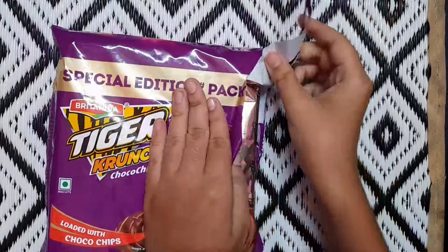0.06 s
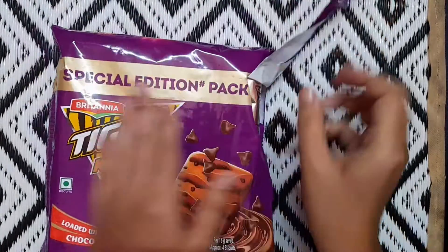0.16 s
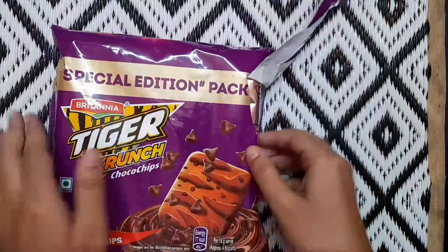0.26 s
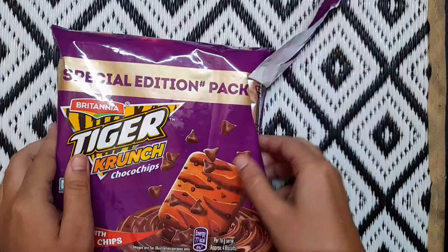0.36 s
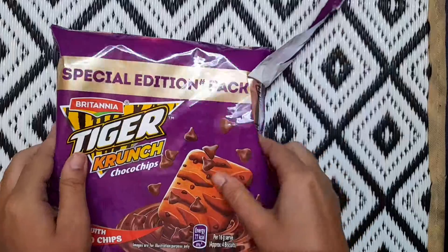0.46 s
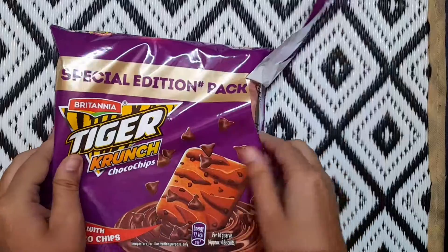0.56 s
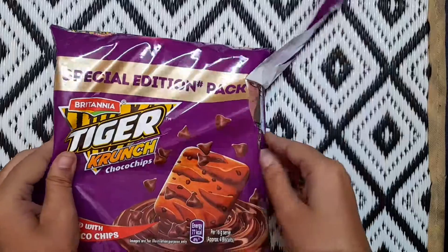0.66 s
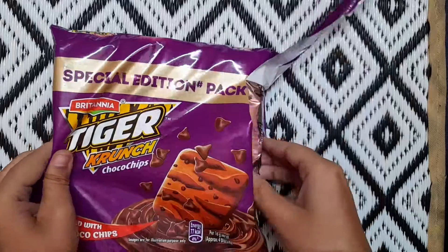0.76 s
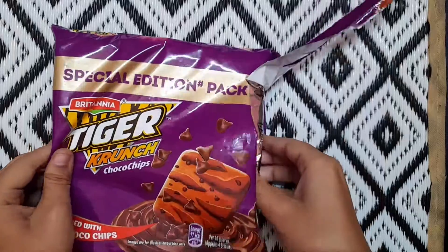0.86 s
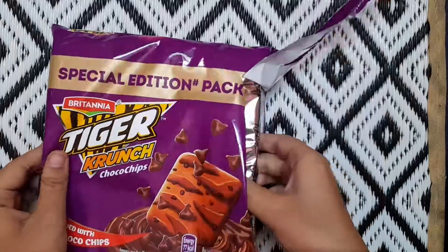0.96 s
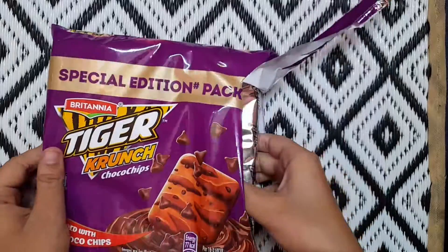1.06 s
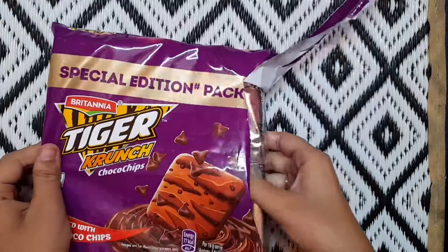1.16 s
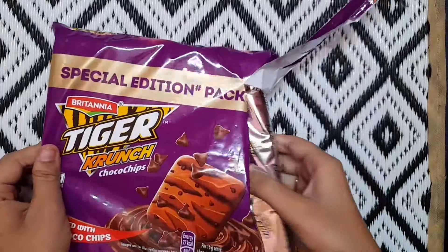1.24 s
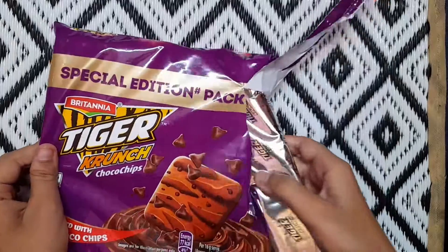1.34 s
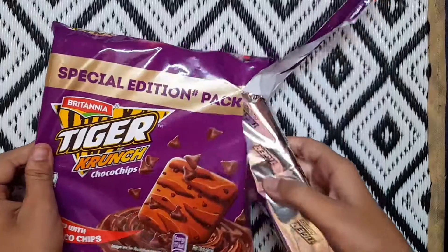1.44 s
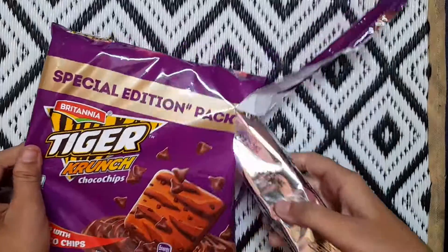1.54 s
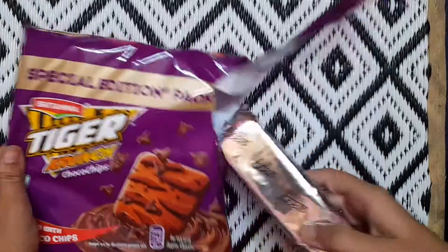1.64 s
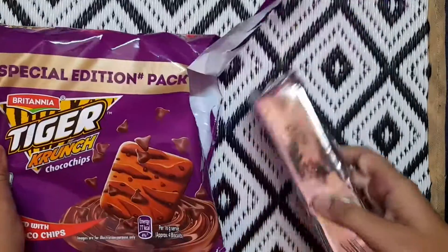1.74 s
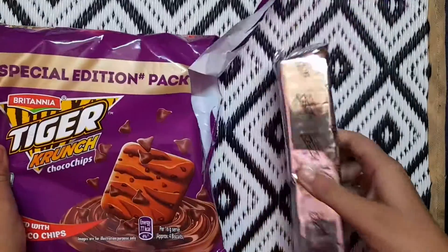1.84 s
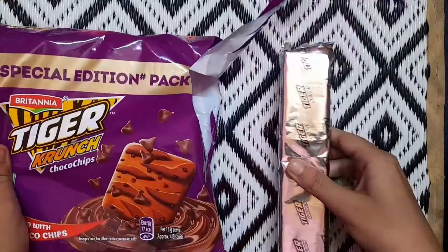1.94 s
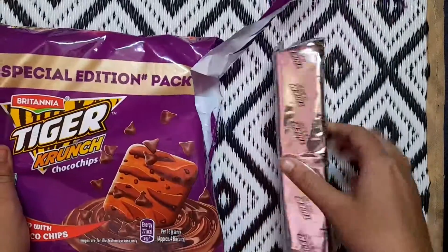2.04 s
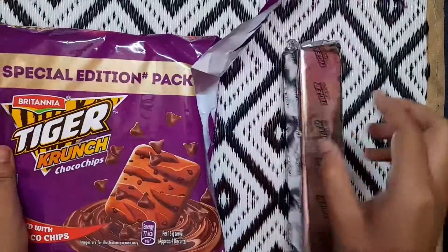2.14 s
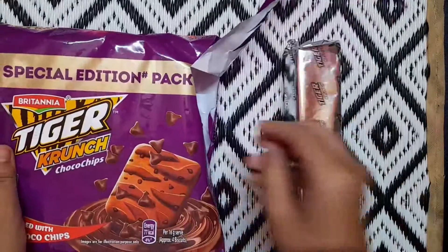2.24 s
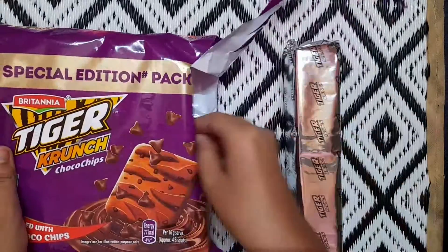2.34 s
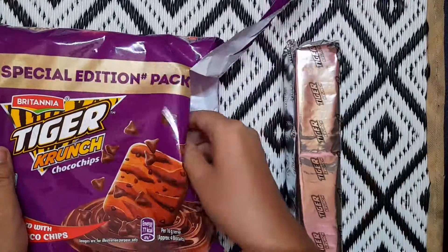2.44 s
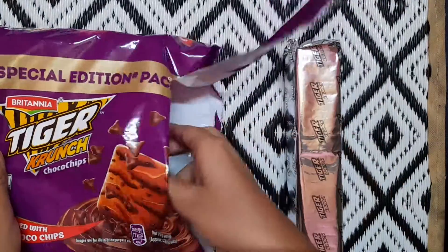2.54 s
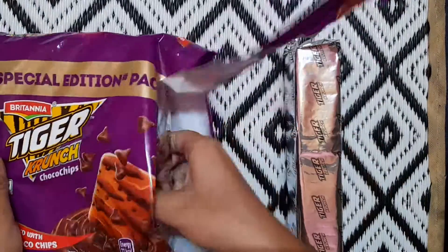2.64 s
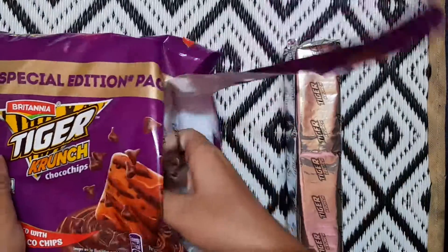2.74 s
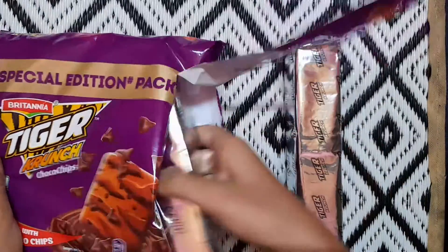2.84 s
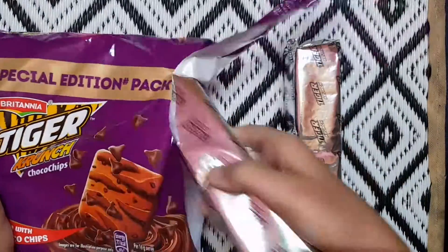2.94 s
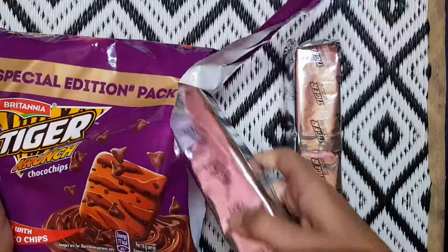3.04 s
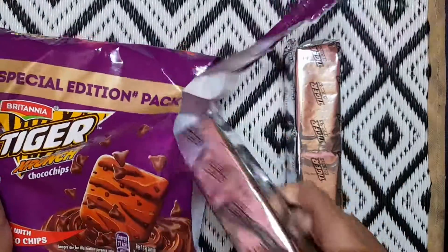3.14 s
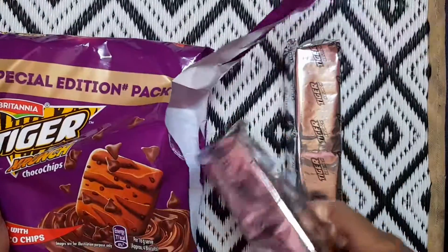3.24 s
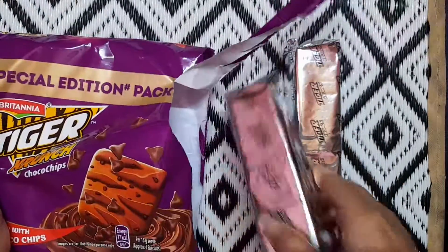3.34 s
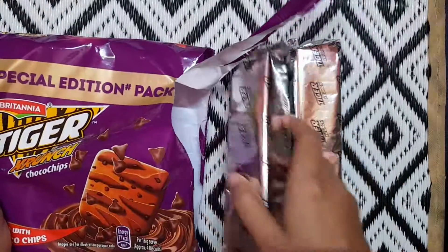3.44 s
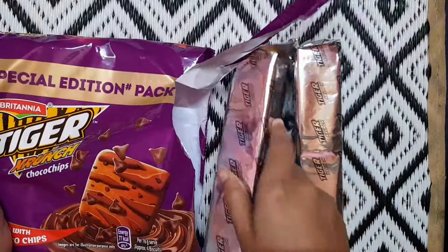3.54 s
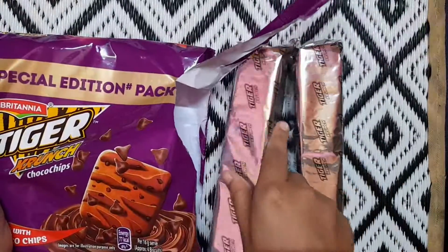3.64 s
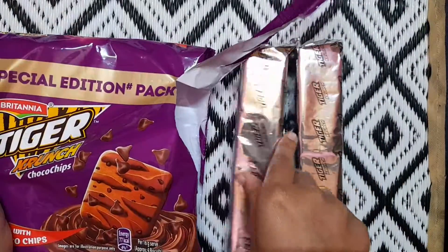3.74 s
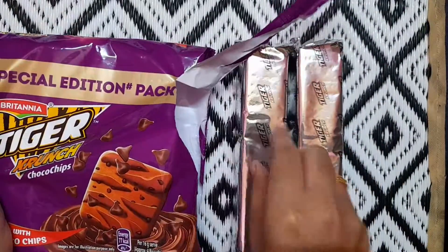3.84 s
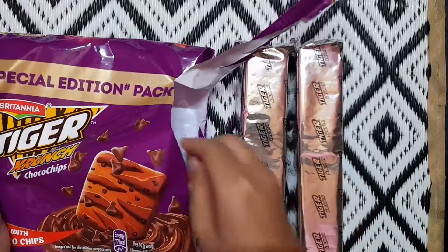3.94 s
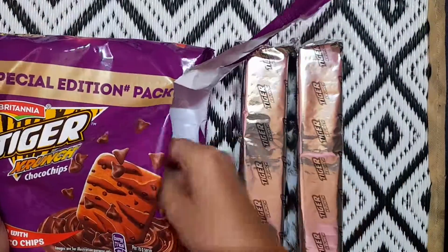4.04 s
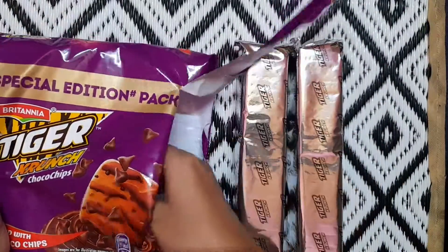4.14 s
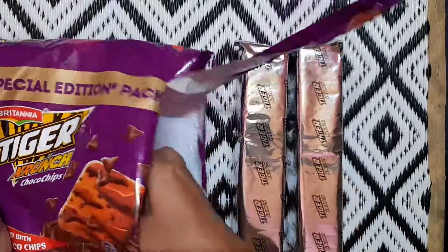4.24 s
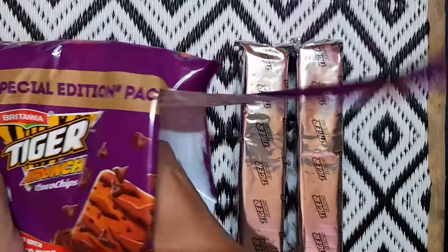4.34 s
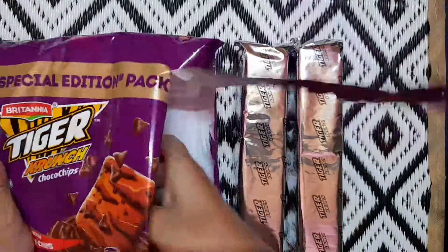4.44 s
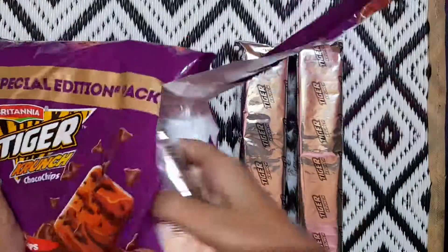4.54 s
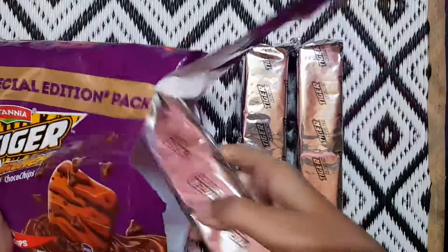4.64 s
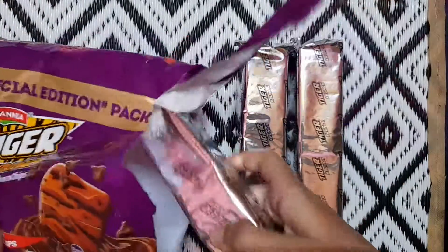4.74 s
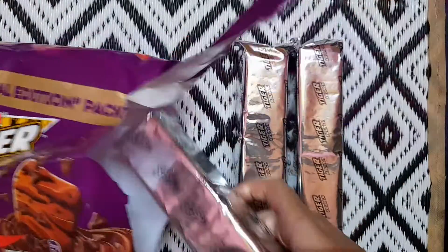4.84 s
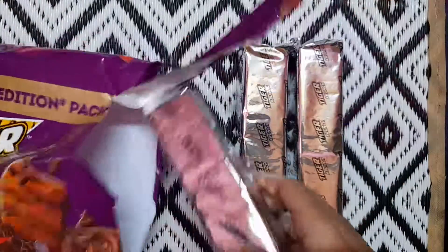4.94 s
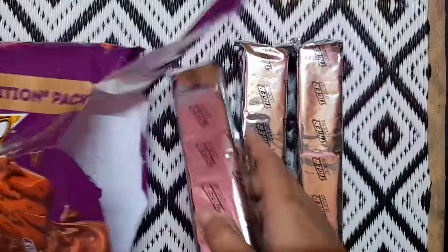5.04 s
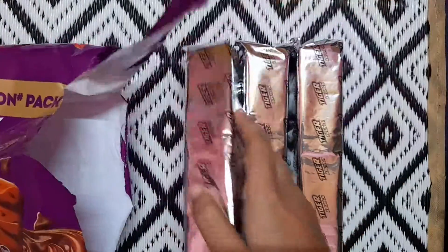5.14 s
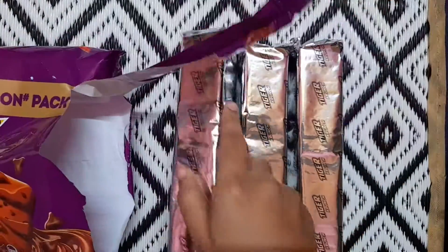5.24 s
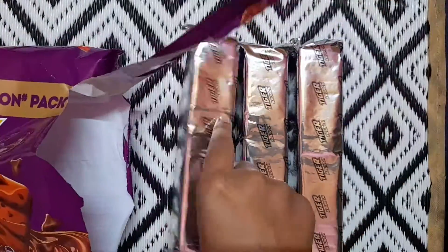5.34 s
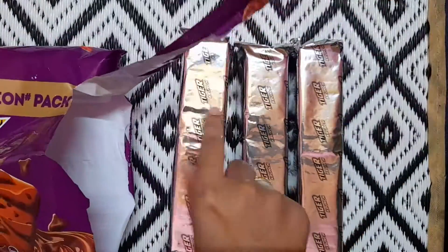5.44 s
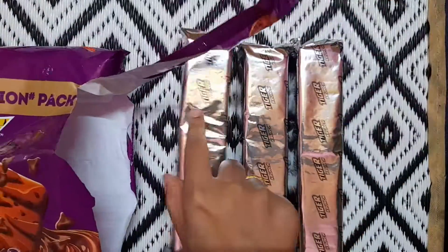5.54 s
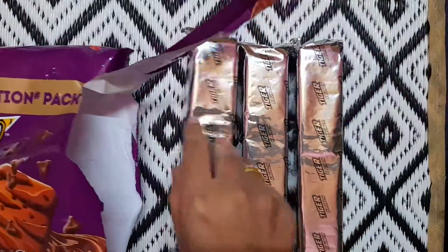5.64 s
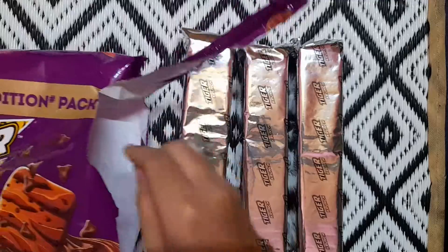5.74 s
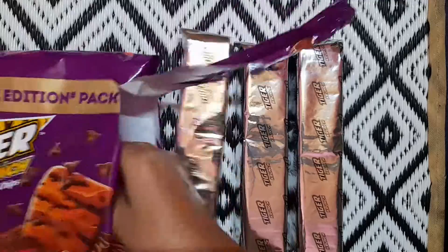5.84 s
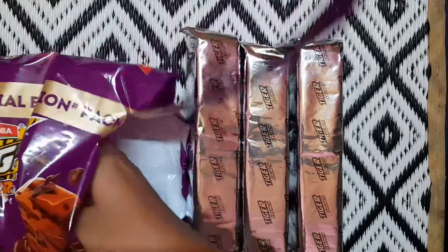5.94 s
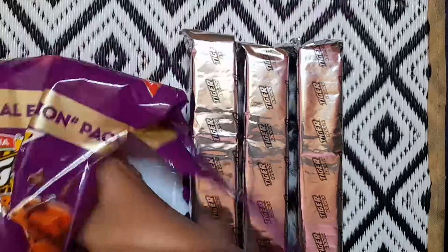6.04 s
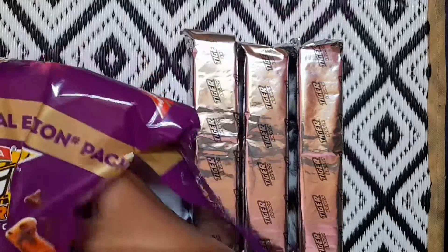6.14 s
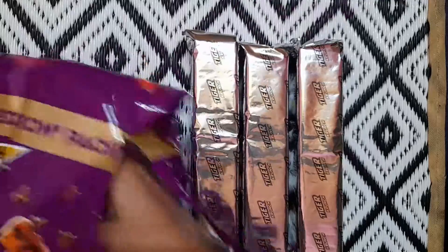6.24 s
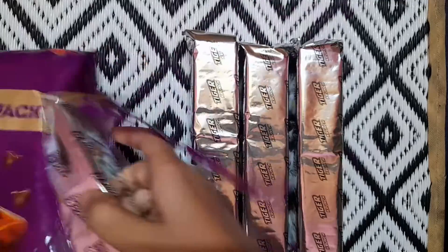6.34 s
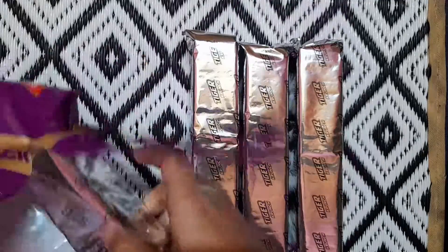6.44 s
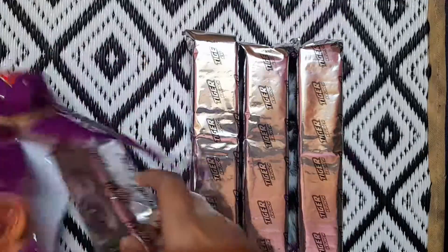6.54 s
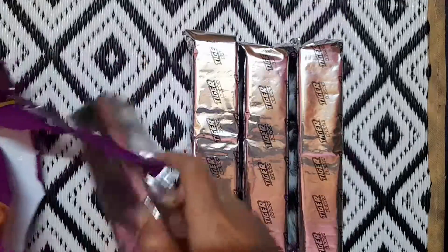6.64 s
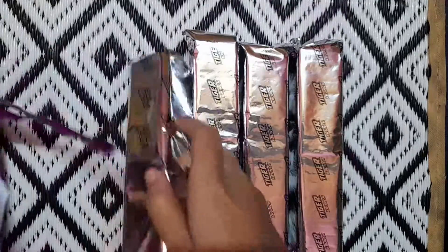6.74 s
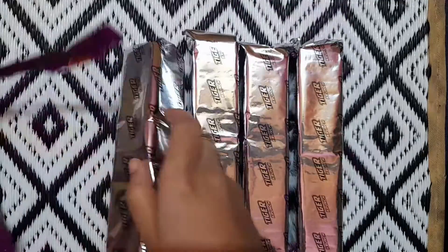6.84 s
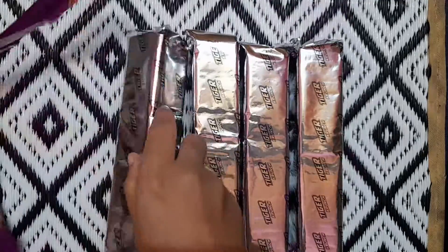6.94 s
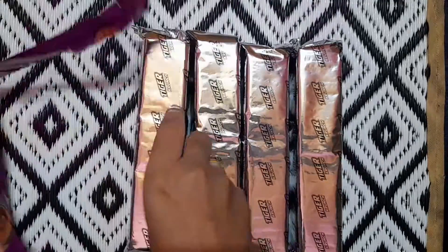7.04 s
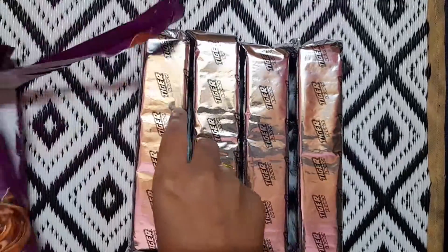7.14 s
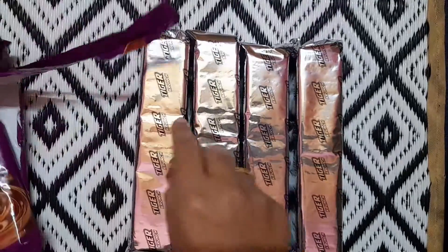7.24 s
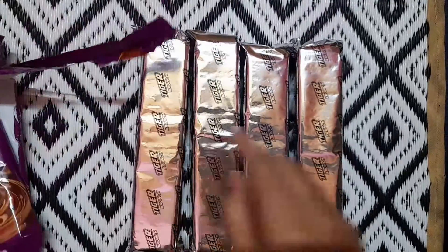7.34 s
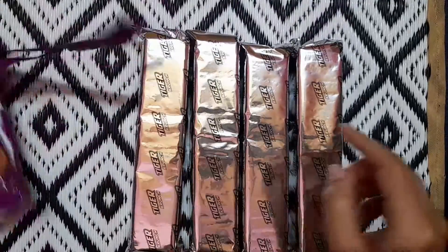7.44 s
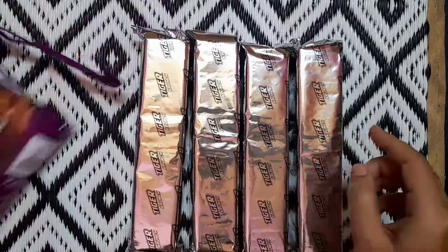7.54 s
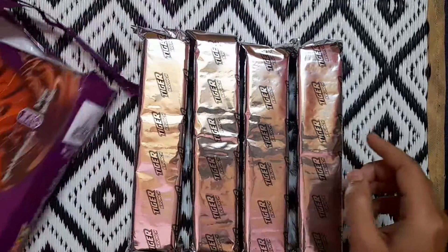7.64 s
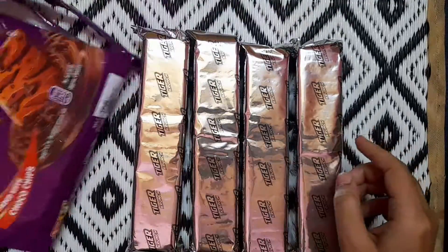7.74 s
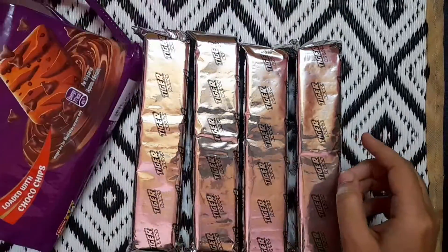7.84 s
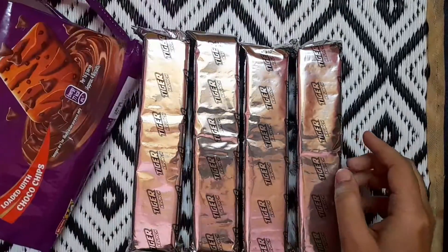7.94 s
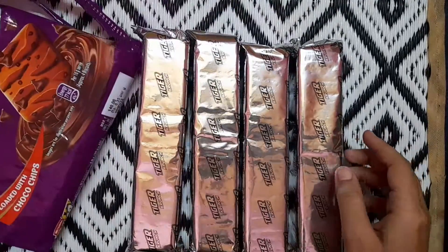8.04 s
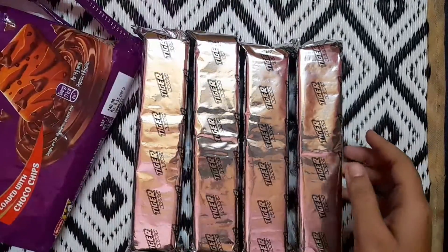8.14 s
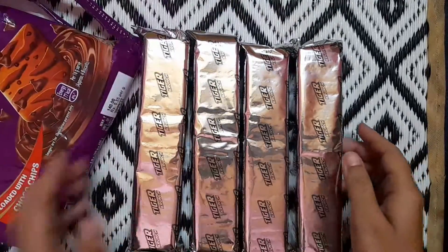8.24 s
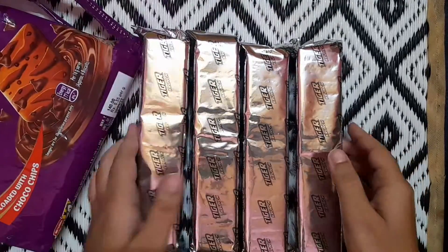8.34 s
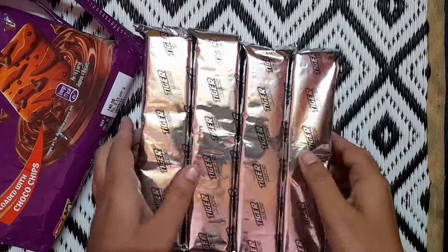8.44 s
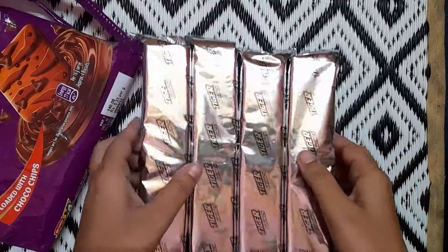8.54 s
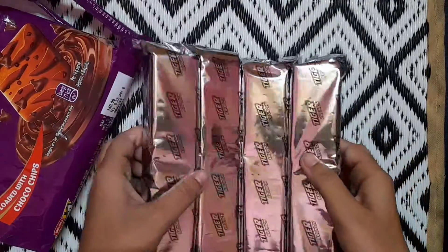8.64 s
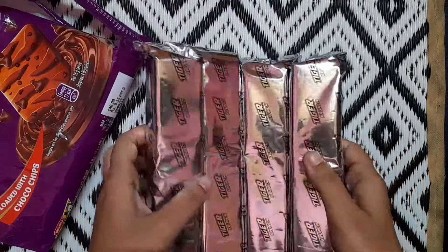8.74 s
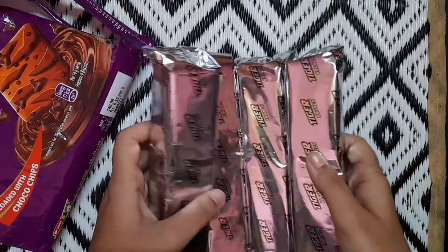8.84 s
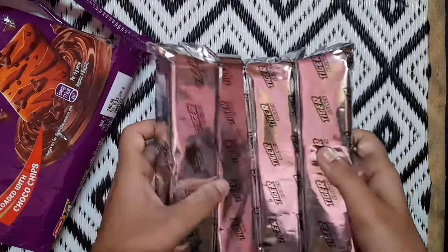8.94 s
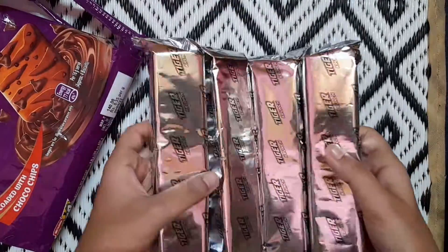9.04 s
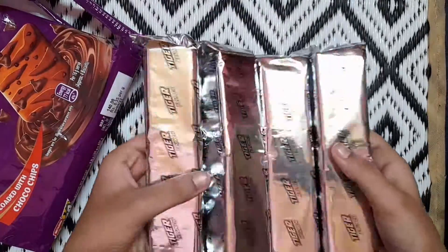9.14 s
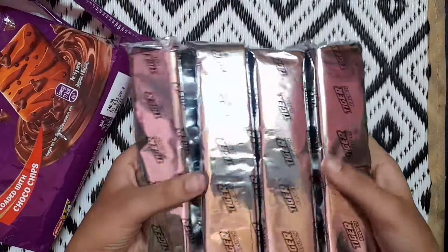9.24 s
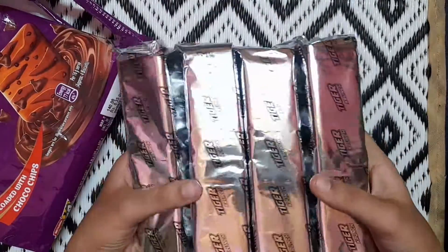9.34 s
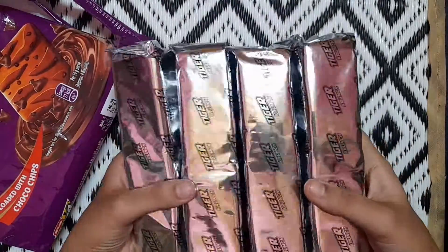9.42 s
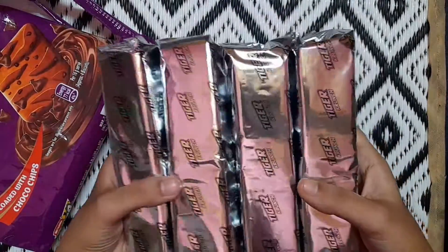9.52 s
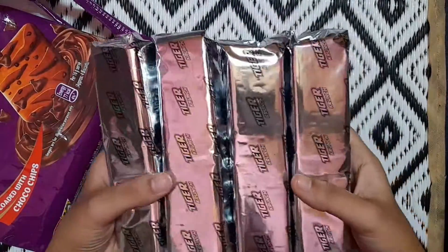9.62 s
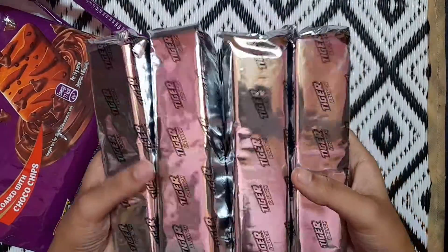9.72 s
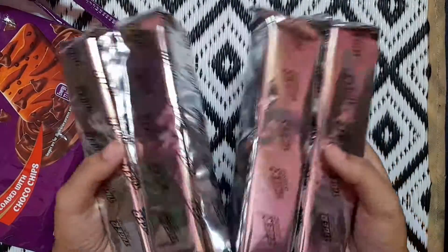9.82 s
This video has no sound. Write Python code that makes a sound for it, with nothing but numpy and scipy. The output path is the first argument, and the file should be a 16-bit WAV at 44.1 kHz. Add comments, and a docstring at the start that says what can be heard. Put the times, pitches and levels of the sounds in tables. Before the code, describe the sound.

Close up in a small quiet room, a slack plastic bag crackles and rustles as hands work it. Four foil-wrapped biscuit packs slide out one by one, each followed by a soft, dull landing on a mat-covered table. The rustling is loudest around the third and fourth pulls, with sharp snaps. The emptied bag is pushed aside, then the packs are squeezed together with lighter, crisper crinkles and a couple of small pops over faint rumble and hiss.

```python
"""Foil crackles and rubs in bursts, single creases snap through, and packs land with soft thuds.
Hands slide foil-wrapped biscuit packs out of a torn plastic bag, lay them on a mat-covered table and gather them up.
Each stroke drives filtered slip noise and random small buckles; snaps, pops and landings are placed one by one.
Decaying noise gives the bag's hollow notes and the room; the background is a slightly wide rumble and hiss."""
import sys
import numpy as np
from scipy import signal
from scipy.io import wavfile

SR = 44100
rng = np.random.default_rng(int(sys.argv[2]) if len(sys.argv) > 2 else 0)


def inscribe(sig):
    """Save sig as 16-bit PCM at rate SR to the path in sys.argv[1].

    A 1-D sig is mono; a 2-D sig holds one channel per row.
    Samples are clipped to [-1, 1] before scaling.
    """
    pcm = np.round(np.clip(np.atleast_2d(sig).T, -1, 1) * 32767)
    wavfile.write(sys.argv[1], SR, pcm.astype(np.int16))


N = 435706
TIME = np.arange(N) / SR
EDGES = np.geomspace(45, 17000, 22)  # filter bank, Hz
CENTRES = np.sqrt(EDGES[1:] * EDGES[:-1])

# Room rumble and hiss. Each row: frequency in Hz, relative level in dB per Hz.
FLOOR_COLOUR = [(30, 4), (90, 8), (300, 4), (800, -22), (2500, -29), (5500, -14), (7500, -7), (16000, -8)]
# The table under the mat. Each row: mode frequency in Hz, relative level in dB, t60 in seconds.
TABLE_MODES = [(54, -15, .65), (64, 2, .16), (92, .5, .15), (129, -1, .16), (217, 7, .12)]
# Packs landing on the table or pressed against it.
# Each row: start in seconds, relative force in dB, contact time in seconds.
LANDINGS = [(2.025, -58, 0.0099), (3.612, -52, 0.0081), (5.352, -41.5, 0.0037), (7.045, -49, 0.0063),
            (8.385, -70, 0.0061), (8.697, -63, 0.011), (8.971, -63, 0.014)]
# The bag pushed about. Each row: start in seconds, t60 in seconds, level in dB, pitch of the air inside in Hz.
BAG_PUSHES = [(0.015, 0.19, -49, 432), (7.493, 0.61, -58.5, 335)]
# Colour of the film. Each row: frequency in Hz, relative level in dB per Hz.
FILM_COLOUR = [(60, -7.5), (150, -11), (300, -4.5), (550, 1), (850, 4), (1300, 1.5), (1950, -9), (2700, -3),
               (3600, -5.5), (4700, -14), (6500, -7.5), (9500, -15.5), (16000, -16)]
# Each push, pull or grip of the hands; slack bag sounds dull, taut foil crisp.
# Each row: start in seconds, length in seconds, rustle drive in dB, treble against middle in dB.
STROKES = [(0.004, 0.032, -40, -4.5), (0.148, 0.031, -48.5, 3), (0.312, 0.054, -48.5, 2.5),
           (0.4, 0.051, -49, -3), (0.482, 0.14, -48, -4), (0.66, 0.29, -44, -1.5), (0.92, 0.27, -42, -1),
           (1.258, 0.033, -40, -2), (1.306, 0.018, -35, -0.5), (1.36, 0.18, -56, -4),
           (1.491, 0.024, -44, -2), (1.557, 0.16, -44.5, 1.5), (1.81, 0.13, -57.5, 0),
           (1.994, 0.0084, -41, -2.5), (2.13, 0.12, -50.5, -5.5), (2.346, 0.15, -54, -0.5),
           (2.493, 0.17, -44, -5), (2.646, 0.19, -41, 0.5), (2.862, 0.11, -37, -2),
           (3.103, 0.042, -46.5, -6.5), (3.179, 0.017, -40, -5), (3.306, 0.25, -55.5, -5),
           (3.59, 0.033, -43.5, -3.5), (3.706, 0.089, -49.5, -0.5), (3.953, 0.27, -61.5, -6.5),
           (4.104, 0.48, -47, -4.5), (4.237, 0.17, -39.5, -3), (4.407, 0.38, -46.5, -5.5),
           (4.477, 0.2, -38.5, -1), (4.828, 0.11, -43, -3.5), (4.994, 0.082, -37, -3),
           (5.14, 0.076, -46, 0.5), (5.302, 0.068, -46, 4.5), (5.526, 0.2, -59.5, -5),
           (5.808, 0.2, -43, -2), (5.915, 0.022, -31.5, -5.5), (6.026, 0.34, -41, -3),
           (6.308, 0.016, -37, 6.5), (6.389, 0.014, -31, -0.5), (6.529, 0.056, -40, -7),
           (6.707, 0.14, -54.5, -4), (6.893, 0.09, -47.5, 2), (7.012, 0.054, -44, 1),
           (7.096, 0.081, -59.5, -11), (7.456, 0.18, -48, -10), (7.573, 0.017, -36.5, 0.5),
           (7.654, 0.19, -54.5, 5), (7.782, 0.069, -48, -2), (8.03, 0.052, -61.5, -3.5),
           (8.363, 0.081, -47, 0.5), (8.49, 0.13, -53.5, -4.5), (8.625, 0.17, -47, 0), (8.766, 0.3, -45, 0),
           (9.13, 0.2, -49.5, -2), (9.224, 0.076, -46.5, -2), (9.336, 0.29, -51, -1),
           (9.65, 0.17, -59.5, -3)]
# Boost of the lows in the rubbing. Each row: time in seconds, boost in dB.
LOW_BOOST = [(0.35, 8.5), (0.7, -4.5), (1.3, 3.5), (1.7, 6.5), (2.6, -2), (3.0, 3), (3.8, -6), (4.4, 3.5),
             (6.2, 2), (7.55, 0.5), (8.8, -4), (9.3, -18)]
# What the hands are on. Each row: time in seconds, tightness from 0 (slack bag) to 1 (tight pack).
ON_PACK = [(1.7, .9), (2.5, .1), (3.5, .6), (4.2, 0), (5.1, 0), (5.15, .9), (5.9, 0), (7.9, 0), (8.4, 1)]
# The taut face of a pack popping in or out. Each row: start in seconds, relative level in dB.
POPS = [(1.922, -50), (1.961, -49), (8.7883, -42.5), (8.8062, -35)]
# Big creases snapping through. Each row: start in seconds, level in dB, pitch of the buckling facet in Hz.
SNAPS = [(0.0147, -36.5, 1740), (0.1318, -46, 1360), (0.184, -45.5, 1380), (0.306, -46.5, 7100),
         (0.334, -49, 2350), (0.574, -51.5, 2620), (0.7176, -41, 3000), (0.826, -45, 3070),
         (0.8707, -45.5, 2200), (0.994, -43.5, 5100), (1.095, -43, 1470), (1.113, -46, 3800),
         (1.198, -55.5, 4900), (1.2445, -41.5, 1530), (1.4142, -49.5, 2090), (1.5954, -46.5, 2560),
         (1.6673, -41, 1480), (1.723, -54, 2740), (1.824, -52.5, 2700), (2.1595, -51.5, 2580),
         (2.181, -48.5, 4040), (2.196, -55, 5000), (2.3605, -49.5, 2560), (2.5182, -46.5, 2420),
         (2.7027, -39, 3420), (2.7383, -39.5, 4020), (2.7505, -53, 4300), (2.79, -40, 1350),
         (2.8962, -38.5, 2080), (2.9126, -39, 3180), (2.9317, -35.5, 1330), (3.0495, -47.5, 1880),
         (3.1712, -42.5, 3100), (3.3083, -41.5, 2250), (3.3304, -48, 3620), (3.471, -53, 2740),
         (3.6148, -44, 3400), (3.7019, -50.5, 3330), (3.8241, -54, 3130), (4.0068, -50.5, 4640),
         (4.095, -49, 1190), (4.1133, -42, 1370), (4.2595, -37, 2240), (4.2737, -34, 2160),
         (4.3072, -39, 1610), (4.3568, -36.5, 2440), (4.568, -39.5, 3000), (4.554, -39, 1690),
         (4.6685, -40, 1380), (4.68, -38, 1370), (4.7616, -43.5, 1620), (4.866, -40.5, 1290),
         (4.892, -36, 1690), (5.0061, -54, 1400), (5.0724, -44.5, 1300), (5.2105, -49.5, 3040),
         (5.306, -45.5, 1360), (5.5559, -50.5, 2650), (5.8657, -40, 1290), (5.9398, -44, 1450),
         (5.962, -38, 1040), (6.0752, -37.5, 1190), (6.203, -35.5, 2520), (6.2675, -39, 4100),
         (6.3329, -36.5, 2650), (6.3528, -43, 2570), (6.3965, -36, 2400), (6.4005, -32.5, 1040),
         (6.4045, -32, 3000), (6.556, -39.5, 1020), (6.589, -37, 1390), (6.744, -47.5, 2420),
         (6.923, -49, 1900), (7.0456, -37, 2150), (7.497, -44, 1060), (7.6593, -41.5, 4150),
         (7.7853, -42.5, 3020), (7.858, -45, 2200), (8.3707, -58, 1850), (8.445, -43.5, 2100),
         (8.9069, -42, 2900), (8.9731, -44, 5440), (9.0003, -39, 1880), (9.166, -53.5, 1940),
         (9.263, -42, 1820), (9.2853, -43.5, 3860), (9.3208, -41, 3400), (9.5773, -44, 2780),
         (9.6021, -45.5, 2280), (9.6917, -48.5, 6300), (9.766, -50, 1280)]


def from_db(db):
    """Turns dB into an amplitude factor."""
    return 10 ** (np.asarray(db) / 20)


def rms_one(x):
    """Scales each row to an RMS of 1."""
    return x / np.sqrt(np.mean(x ** 2, axis=-1, keepdims=True) + 1e-20)


def in_time(rows):
    """Draws a straight-line curve over the whole scene."""
    return np.interp(TIME, *np.transpose(rows))


def at_hz(points, hz):
    """Reads a colour curve, interpolated along log frequency."""
    curve_hz, curve_db = np.transpose(points)
    return np.interp(np.log(hz), np.log(curve_hz), curve_db)


def low_pass(x, hz):
    """Rolls off the top gently, at 6 dB per octave."""
    return signal.sosfilt(signal.butter(1, hz, fs=SR, output="sos"), x)


def band(x, k):
    """Passes band k of the filter bank."""
    sos = signal.butter(2, EDGES[k:k + 2], "band", fs=SR, output="sos")
    return signal.sosfilt(sos, x + 1e-18)


def treble_share(hz):
    """Rises from about -1/2 below 1900 Hz to 1/2 above it."""
    return .5 * np.tanh(2 * np.log(hz / 1900))


def drift(corner_hz):
    """Wanders smoothly at random with an RMS of 1, made at a twentieth of the sample rate."""
    r = np.exp(-40 * np.pi * corner_hz / SR)
    slow = signal.lfilter([1], [1, -2 * r, r * r], rng.standard_normal(N // 20 + 2002))
    slow = slow[2000:]  # skip the filter's run-in
    return np.interp(np.arange(N) / 20, np.arange(len(slow)), rms_one(slow))


def place(times, sounds):
    """Lays short sounds out in time."""
    out = np.zeros(N + sounds.shape[1])
    starts = np.clip(times * SR, 0, N - 1).astype(int)
    for at, sound in zip(starts, sounds):
        out[at:at + len(sound)] += sound
    return out[:N]


def floor(level_db=-76, side_share=0.32):
    """Steady noise of rumble and hiss, differing a little between the sides."""
    out = 0
    for k, hz in enumerate(CENTRES):
        mid, side = band(rng.standard_normal((2, N)), k)
        out = out + from_db(at_hz(FLOOR_COLOUR, hz)) * (mid + side * [[1], [-1]] * side_share)
    return from_db(level_db) * rms_one(out)


def room(x, t60=.24, level_db=-16, wall_cut_hz=4600):
    """A diffuse tail of decaying noise, starting after 4 ms and dulled by the walls."""
    t = np.arange(SR // 2) / SR
    tail = rng.standard_normal(len(t)) * from_db(-60 * t / t60) * (t > .004)
    tail = low_pass(tail, wall_cut_hz)
    return from_db(level_db) * signal.fftconvolve(x, tail / np.linalg.norm(tail))[:N]


def dragging(level_db=-62.0, top_hz=260, middle_s=8.79, spread_s=0.096):
    """The packs rumble unevenly over the weave of the mat as they are pushed together: one swell of low noise."""
    sos = signal.butter(2, top_hz, fs=SR, output="sos")
    rumble = rms_one(signal.sosfilt(sos, rng.standard_normal(N)))
    swell = np.exp(-.5 * ((TIME - middle_s) / spread_s) ** 2)
    return from_db(level_db + 2 * drift(17)) * rumble * swell


def landings(second_end_s=0.01283, second_end_db=4.0, settle_s=0.052, settle_db=-4.5):
    """A pack touches with one end, then the other, then settles; the three soft pushes ring the table's modes."""
    s, force_db, contact_s = np.transpose(LANDINGS)
    t = np.arange(SR // 20) / SR
    push = np.sin(np.pi * np.minimum(t / contact_s[:, None], 1)) ** 2
    push = push / push.sum(axis=1, keepdims=True) * from_db(force_db)[:, None]
    force = place(s, push)
    force = force + from_db(second_end_db) * place(s + second_end_s, push)
    force = force + from_db(settle_db) * place(s + settle_s, push)
    out = 0
    for hz, mode_db, t60 in TABLE_MODES:
        r, w = from_db(-60 / (t60 * SR)), 2 * np.pi * hz / SR
        ring = signal.lfilter([0, np.sin(w)], [1, -2 * r * np.cos(w), r * r], force + 1e-18)
        out = out + from_db(mode_db) * ring
    return out


def biscuits(level_db=-1.5, t60=0.3, fall_db=-2.0, damping=0.46, hard_s=0.0029):
    """Wrapper and biscuits knock as decaying noise, louder for short contacts; the highs die first."""
    s, force_db, contact_s = np.transpose(LANDINGS)
    t = np.arange(SR // 4) / SR
    body_hz, knock = 200, 0
    for k in np.flatnonzero(CENTRES > body_hz):
        above = CENTRES[k] / body_hz
        noise = rms_one(band(rng.standard_normal((len(s), len(t))), k))
        decay_db = -60 * t / t60 * above ** damping
        knock = knock + noise * from_db(fall_db * np.log(above) + decay_db)
    hardness = (hard_s / contact_s[:, None]) ** 2
    return place(s, from_db(force_db + level_db)[:, None] * hardness * knock)


def hollow_bag(sharpness=8.3):
    """When the bag is pushed about, the air inside resonates in a short hollow note of filtered noise."""
    out = 0
    for start, t60, level_db, hz in BAG_PUSHES:
        noise = band(rng.standard_normal(N), np.searchsorted(EDGES, hz) - 1)
        air = rms_one(signal.lfilter(*signal.iirpeak(hz, sharpness, fs=SR), noise))
        after = TIME - start
        out = out + air * (after > 0) * from_db(level_db - 60 * np.abs(after) / t60)
    return out


def handling():
    """Every stroke swells, holds while the hand moves, then stops and settles; gives drive and crispness in dB."""
    rest_db, rest_crisp_db = -78.5, -9.5  # the film between strokes
    attack_s, swell_share = 0.0032, 0.11  # a long stroke swells more gradually
    stop_db_per_s = 357  # sliding stops quickly
    lingering, settle_db_per_s = 0.21, 115  # a part lingers while the folds relax
    power = np.full(N, from_db(rest_db) ** 2)
    crisp_sum = power * rest_crisp_db
    for start, length, drive_db, crisp_db in STROKES:
        span = slice(max(int(start * SR), 0), int((start + length + .5) * SR))
        t = TIME[span] - start
        after = np.maximum(t - length, 0)
        swell = np.clip(t / (attack_s + swell_share * length), 0, 1)
        stop = (1 - lingering) * from_db(-stop_db_per_s * after)
        settle = lingering * from_db(-settle_db_per_s * after)
        stroke = (from_db(drive_db) * swell * (stop + settle)) ** 2
        power[span] += stroke
        crisp_sum[span] += stroke * crisp_db
    return 10 * np.log10(power), crisp_sum / power


def rubbing(rustle_db, crisp_db, bag_boom=0.15, pack_lift_db=2.5):
    """Film slides on film in random slips, each a tick and a short rush in its own colour; hard pulls add lows."""
    level_db, patchy_db, dull_hz = -6.5, 1.5, 7500
    slips_per_s, tick_s, rush_s = 260, .001, .008
    slip_hz, slip_db, pack_hz, pack_db = 2000, 10, 1700, 6
    at = np.flatnonzero(rng.random(N) < slips_per_s / SR)
    strength = rng.exponential(1, len(at))
    fold_hz = slip_hz * 2 ** rng.uniform(-2.13, 2.17, len(at))
    powers = from_db(at_hz(FILM_COLOUR, CENTRES)) ** 2 * np.diff(EDGES)
    boom_db = in_time(LOW_BOOST) + bag_boom * (rustle_db + 42.5)
    on_pack = in_time(ON_PACK)
    hollow_hz = pack_hz * 2 ** (0.15 * drift(10))  # the pack's resonance wanders in pitch
    out = 0
    for k, hz in enumerate(CENTRES):
        # each slip is strongest around the pitch of the fold that lets go
        slips = np.zeros(N)
        slips[at] = strength * from_db(slip_db * np.exp(-2 * np.log2(hz / fold_hz) ** 2))
        tick = signal.lfilter([1], [1, -np.exp(-1 / (tick_s * SR))], slips + 1e-18)
        rush = signal.lfilter([1], [1, -np.exp(-1 / (rush_s * SR))], slips + 1e-18)
        friction = 3.5 * tick + rush + .5 * rush.mean()
        colour_db = crisp_db * (treble_share(hz) + 0.11) + boom_db / (1 + (hz / 520) ** 4)
        pack_peak_db = pack_db * np.exp(-(2 * np.log2(hz / hollow_hz)) ** 2)
        colour_db = colour_db + on_pack * (pack_peak_db + pack_lift_db)
        # the folds keep changing shape, so each band's level wanders
        gain = np.sqrt(powers[k] / powers.sum()) * from_db(colour_db + patchy_db * drift(10))
        out = out + gain * rms_one(band(friction * rng.standard_normal(N), k))
    # sliding is soft, so its top is dulled
    return from_db(rustle_db + level_db) * low_pass(out, dull_hz)


def buckles(facet_hz, focus_db=9.0, focus_octaves=1.0, tilt_db=5.0, uneven_db=5.5, ring_db=-14.0):
    """A facet flips at once and its crowded modes die in milliseconds, highs first; high facets are brighter."""
    t = np.arange(640) / SR
    crack, crack_s, t60, ring_cycles = 3.0, .0007, .02, 8.0  # t60 in seconds at 2 kHz
    facet_hz, out = facet_hz[:, None], 0
    flip = 1 + crack * np.exp(-t / crack_s)  # the flip itself is a sharp spike
    for k, hz in enumerate(CENTRES):
        if hz < 200:
            continue
        draws = rng.standard_normal((len(facet_hz), len(t)))
        near = np.exp(-.5 * (np.log2(hz / facet_hz) / focus_octaves) ** 2)
        bright_db = tilt_db * np.log2(facet_hz / 1700) * treble_share(hz)
        level_db = at_hz(FILM_COLOUR, hz) + focus_db * near + bright_db + uneven_db * draws[:, -1:]
        decay_db = -60 * t / (t60 * (2000 / hz) ** 0.24)
        out = out + band(draws * flip * from_db(level_db + decay_db), k)
    # the facet's own lowest mode gives each snap a hint of pitch
    ring = np.sin(2 * np.pi * facet_hz * t) * from_db(-60 * t * facet_hz / ring_cycles)
    out = rms_one(out) + from_db(ring_db) * rms_one(ring)
    return out / np.sqrt(np.mean(out[:, :176] ** 2, axis=1, keepdims=True))  # RMS 1 over the first 4 ms


def crackle(rustle_db, crisp_db, count=1300, facet_hz=2700, crowding=0.27):
    """Small creases buckle at random, as strongly as the film is worked; under hard pulls they stand out less."""
    level_db, spread_db, spread_octaves = -7.5, 4.5, .75
    at = (rng.random(count) * N).astype(int)
    size, facet = rng.standard_normal(count), rng.standard_normal(count)
    hz = facet_hz * 2 ** (spread_octaves * np.clip(facet, -2, 2) + 0.11 * crisp_db[at])
    worked_db = rustle_db[at] - crowding * np.maximum(rustle_db[at] + 66.0, 0)
    gain = from_db(worked_db + level_db + spread_db * np.minimum(size, 1.6))
    return place(at / SR, gain[:, None] * buckles(np.minimum(hz, SR / 4)))


def pops(face_hz=2000, vary_octaves=0.16, t60=0.011, crack_db=-3.0):
    """The taut face of a pack flips with a crack and rings briefly, near the same hollow pitch each time."""
    s, level_db = np.transpose(POPS)
    hz = face_hz * 2 ** (vary_octaves * rng.standard_normal(len(s)))
    t = np.arange(SR // 20) / SR
    ring = 2 * np.sin(2 * np.pi * hz[:, None] * t) * from_db(-60 * t / t60)
    gain = from_db(level_db)[:, None]
    return place(s, gain * ring) + place(s, gain * from_db(crack_db) * buckles(hz))


def snaps():
    """Big creases buckle through, each at its own pitch and level."""
    s, level_db, facet_hz = np.transpose(SNAPS)
    return place(s, from_db(level_db)[:, None] * buckles(facet_hz))


def scene(table_left_db=0.3):
    """Film and table sound close by, the film with a little room behind it, the table a touch to the left."""
    rustle_db, crisp_db = handling()
    on_pack = in_time(ON_PACK)
    table = landings() + biscuits() + dragging()
    table = table * from_db(table_left_db * np.array([[1], [-1]]))
    # a tight pack is driven harder in its crackle and softer in its rub than the slack bag
    film = hollow_bag() + rubbing(rustle_db - 5 * on_pack, crisp_db)
    film = film + crackle(rustle_db + 3 * on_pack, crisp_db) + pops() + snaps()
    return floor() + room(film) + table + film


def record(dry, bass_hz=38, top_hz=15850):
    """The deepest bass is rolled off and the top is cut steeply."""
    dry = signal.sosfilt(signal.butter(2, bass_hz, "high", fs=SR, output="sos"), dry)
    return signal.sosfilt(signal.ellip(10, .2, 80, top_hz, fs=SR, output="sos"), dry)


dry = scene()
out = record(dry)
inscribe(out)
```